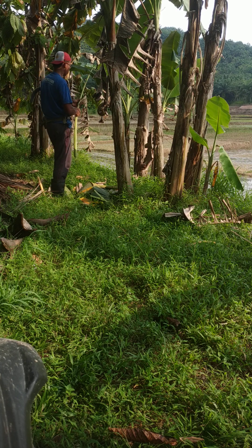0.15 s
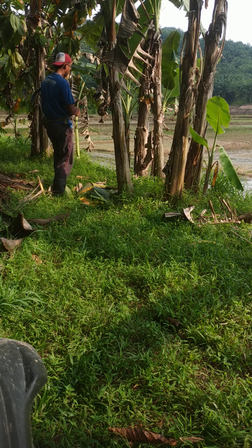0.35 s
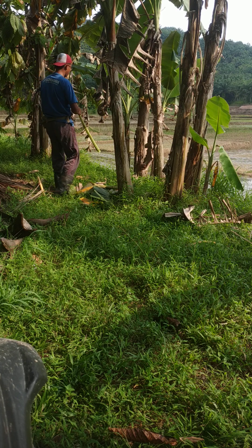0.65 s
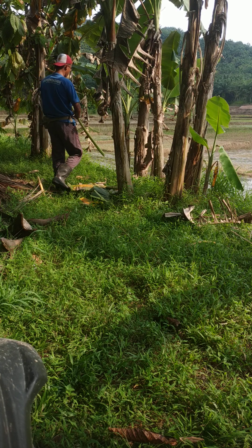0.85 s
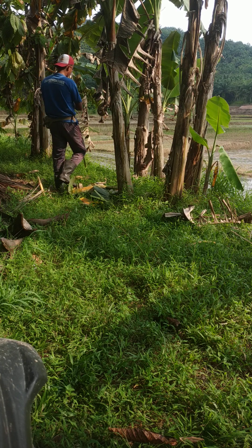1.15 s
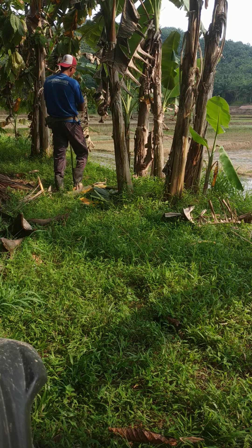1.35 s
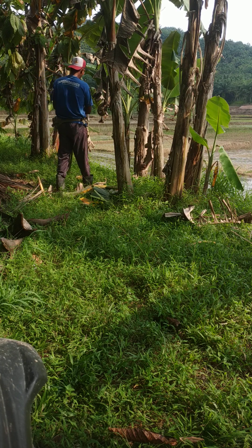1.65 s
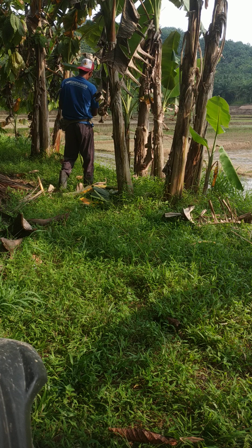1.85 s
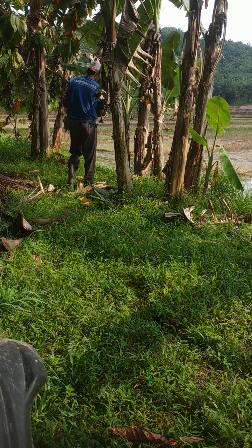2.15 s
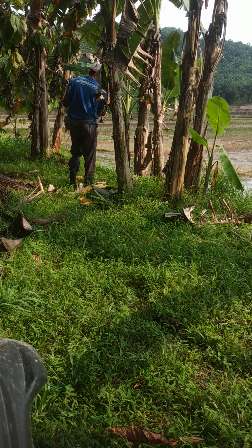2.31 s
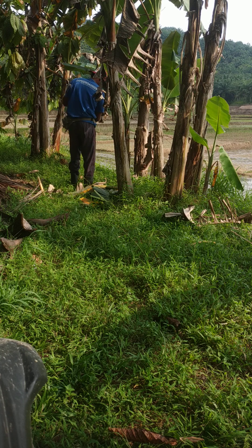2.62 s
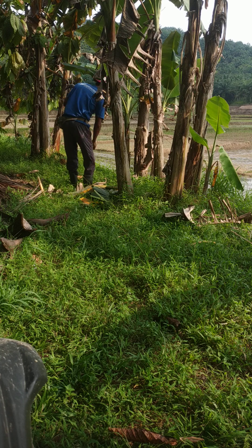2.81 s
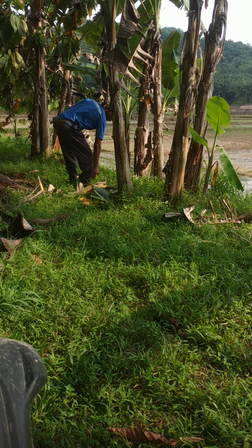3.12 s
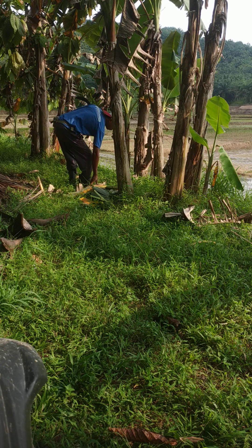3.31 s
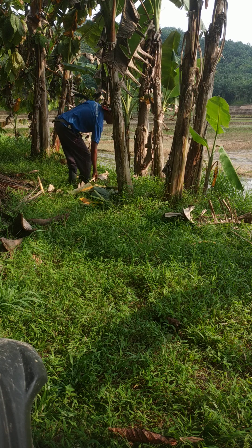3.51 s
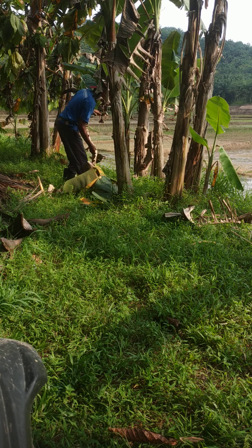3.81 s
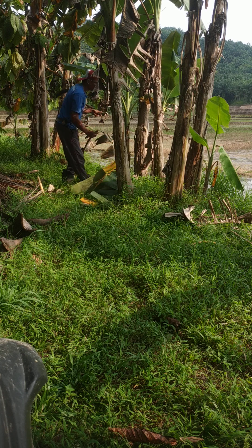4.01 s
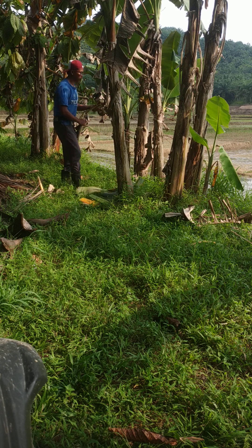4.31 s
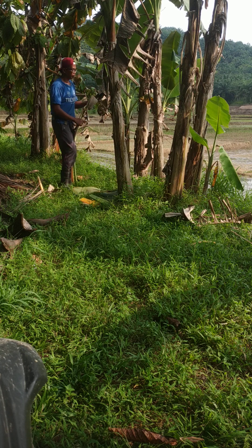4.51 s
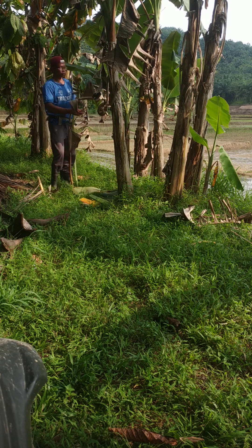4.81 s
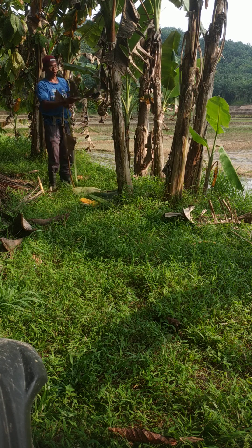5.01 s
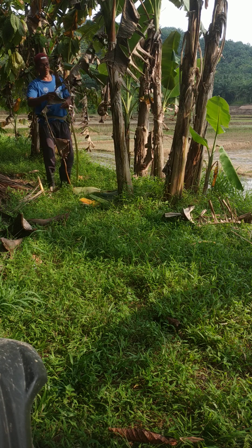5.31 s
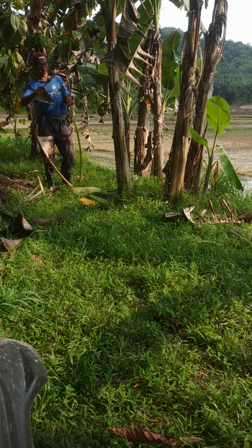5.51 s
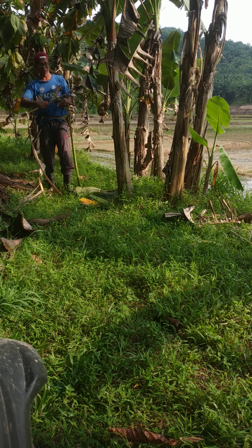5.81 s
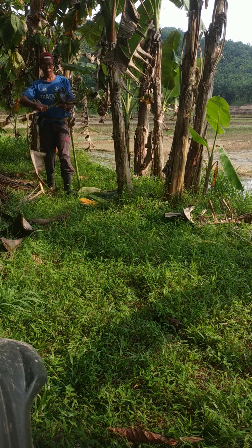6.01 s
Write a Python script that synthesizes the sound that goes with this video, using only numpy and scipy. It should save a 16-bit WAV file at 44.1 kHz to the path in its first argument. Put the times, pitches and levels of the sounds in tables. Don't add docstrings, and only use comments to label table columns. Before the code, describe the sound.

Brittle plant fibres snap and papery sheets rattle in uneven bursts, with small hollow stalk knocks, against quiet outdoor hiss and faint insects.

```python
import sys
import numpy as np
from scipy import signal
from scipy.fft import rfft, irfft, next_fast_len
from scipy.io import wavfile
from scipy.ndimage import uniform_filter1d, map_coordinates

SR = 44100
rng = np.random.default_rng(int(sys.argv[2]) if len(sys.argv) > 2 else 0)


def ratio_of_db(decibels):
    return 10 ** (np.asarray(decibels, float) / 20)


def wav_record(signal):
    frames = np.transpose(np.atleast_2d(signal))
    bounded = np.clip(frames, -1, 1)
    quanta = np.round(bounded * 32767).astype(np.int16)
    wavfile.write(sys.argv[1], SR, quanta)


N = 271215

# (frequency [Hz], level [dB per Hz])
FIBRE_COLOUR = [(3000, -31.5), (5500, -6.5), (6460, -5), (7730, 0.5), (10700, 0.5), (11800, -1.5),
                (14900, -2), (17000, -15.5)]
PING_COLOUR = [(3000, -31), (6500, -11.5), (8000, 0), (9500, 3), (11500, -4), (13500, -11), (16500, -15.5)]
RIB_COLOUR = [(1500, -38.5), (2800, -8), (3500, -1), (4800, 2.5), (6000, -5.5), (7500, -2), (12000, -64.5)]
SHEET_COLOUR = [(650, -37.5), (1100, -12.5), (1500, -7), (2400, -1.5), (2900, -6), (4000, -14.5),
                (8000, -86.5)]
STALK_COLOUR = [(71, -70), (120, -42), (185, -1), (249, -3), (317, -6.5), (527, 1), (1500, -4.5),
                (1950, -10.5), (3300, -120)]
EXHAUST_COLOUR = [(60, -34.5), (100, -24), (112, -16), (135, -5.5), (165, -7), (210, 3), (260, -5.5),
                  (400, -24), (800, -54)]
# (frequency [Hz], level [dB per Hz])
AIR_COLOUR = [(30, -37), (245, 0.5), (740, -5.5), (1300, -8), (2600, -8.5), (3100, -9), (3900, -9),
              (5000, -5.5), (6300, -9.5), (7500, -7), (8450, -13), (9000, -4.5), (10900, 0), (11400, -4),
              (12500, -1), (14500, -5.5), (15700, -4.5)]
# (frequency [Hz], likeness [0 to 1])
AIR_LIKENESS = [(60, 1), (180, 0.65), (550, 0.6), (1650, 0.16), (4970, 0.13), (15000, 0.15)]
# (frequency [Hz], left over right [dB])
AIR_LEAN = [(60, -1), (240, -2), (950, -1.5), (3770, 2.5), (15000, -6)]
# (frequency [Hz], rms level [dB], left over right [ratio])
WHINE_TONES = [(1055.8, -72, -.3), (1249.4, -70, -.1), (3362.5, -71, .7), (3556, -72, .35),
               (5669, -71, -.1), (5862, -71, -.1), (9227, -76, 0), (10282, -64, 0), (10475.5, -64, 0),
               (10760, -72, 0), (10862, -71, 0), (11143, -73, 0), (11337.5, -70, 0), (11531, -70, 0),
               (11725, -76, 0), (12010, -74, 0), (12204, -74, 0), (12588.5, -65, 0), (12782, -65, 0),
               (13451, -73, 0), (13644.5, -67, 0), (13838, -63, -.1), (14032, -71, 0), (14508, -77, 0),
               (14896, -76, 0), (15089, -73, 0)]
# (time [s], level [dB])
ENGINE_LEVEL = [
    (0.0, -61.5),
    (0.8, -66.5),
    (2.43, -59),
    (3.3, -62),
    (4.0, -59),
    (4.4, -64.5),
    (5.2, -65.5),
    (6.15, -66),
]
# (frequency [Hz], time to fade by 60 dB [s])
GROVE_FADE = [(200, 0.085), (2000, 0.072), (12000, 0.23)]
# (time [s], peak level [dB], pitch [Hz])
STALK_KNOCKS = [(1.444, -38.5, 887), (4.88, -38, 736), (4.92, -39, 697), (5.165, -41, 780),
                (1.428, -41.5, 2210), (1.492, -46, 970), (1.511, -36, 971), (1.659, -46.5, 1025),
                (2.437, -49, 804), (3.747, -38, 268), (3.835, -40, 1985), (3.9, -39, 2430),
                (3.958, -36, 301), (4.335, -39, 225), (5.036, -44, 556), (5.096, -38, 208),
                (5.28, -32.5, 1224), (5.35, -34, 417), (5.87, -46, 660), (4.023, -38, 346),
                (4.084, -33, 243), (4.316, -37.5, 226), (4.694, -37, 480), (4.757, -36, 500),
                (4.799, -40, 336), (4.869, -39, 1950), (5.091, -34, 780), (5.124, -35.5, 528),
                (5.151, -37.5, 670), (5.255, -34, 612), (5.277, -30, 943), (5.326, -30.5, 880),
                (5.379, -31, 984), (5.46, -36, 418), (5.604, -47, 667), (5.829, -39.5, 776),
                (6.036, -39, 645)]
# (time [s], peak level [dB], pitch [Hz])
FLAT_SLAPS = [(1.3475, -30, 2000), (1.3565, -32, 2050), (4.0805, -28, 260), (4.0815, -32.5, 570),
              (5.8255, -30, 738), (5.8285, -37, 1400), (5.607, -43.5, 676), (5.783, -42, 590),
              (5.712, -46.5, 509), (5.333, -27.5, 1750), (5.342, -32, 1100), (5.391, -31, 1300),
              (5.91, -41, 1200), (6.047, -39.5, 775), (6.134, -39.5, 880), (4.378, -43, 759),
              (3.842, -34, 2300), (3.91, -33, 2450), (2.2885, -34.5, 7750), (2.296, -33, 7800),
              (2.309, -33.5, 6000), (2.255, -42, 5400), (2.314, -41, 2000), (5.3, -37.5, 3800),
              (4.795, -37, 4300), (5.365, -33, 1500)]
# (time [s], peak level [dB], sheet part
# over peak [dB], left over right [dB])
RIPS_RUNNING = [(1.3469, -23.5, -22, 3), (1.859, -49.5, -3, 6), (2.2464, -38.5, -21, 7),
                (2.266, -39, -37, 10), (2.287, -36, -25, 4), (2.309, -31, -21, 6), (3.503, -26, -22, 3),
                (4.316, -25, -27, -1), (4.3244, -25.5, -35, 9), (4.5766, -36.5, -13, 1),
                (4.839, -23, -20, 8.5), (4.87, -25, -26.5, 3), (4.9611, -26.5, -15.5, 3),
                (5.0946, -28.5, -21, 7), (5.149, -30.5, -14, 4), (5.1874, -29, -13.5, 8),
                (5.2024, -29, -20.5, -8.5), (5.2527, -28, -17.5, 6.5), (5.2781, -26, -17.5, 11),
                (5.3482, -27.5, -12.5, 10), (5.854, -30.5, -17.5, 7), (6.038, -33, -16, 4),
                (6.048, -29, -19.5, 2)]
TICKS_ALONE = [(1.3477, -21, -24, -2), (1.354, -25, -18, -4.5), (1.6207, -37.5, -5.5, 4),
               (2.3112, -25, -35, 8), (2.315, -31, -30, 2), (2.3205, -30, -28, 3), (2.3222, -22, -25, -4),
               (2.439, -41.5, -8.5, 0), (2.896, -29, -15.5, 6), (2.898, -38, -19, 1), (3.6183, -29, -15, 1),
               (3.748, -30, -15, -6), (3.834, -26, -20, 5), (3.8445, -26, -18, 4), (3.861, -26, -21, 2),
               (4.422, -22, -18.5, 1), (4.7557, -16.5, -24.5, 4), (5.0956, -24, -23, 1),
               (5.1005, -25, -20, 3), (5.1502, -20.5, -22, 0), (5.1506, -22, -24, 0), (5.2278, -23, -29, 4),
               (5.2285, -20.5, -25, 5), (5.257, -17.5, -23, 1), (5.299, -26, -28, 4),
               (5.343, -17, -23, 1.5), (5.4094, -26, -19, 7), (5.4227, -19.5, -33.5, -4),
               (5.557, -22, -21, 6), (5.5578, -23.5, -16.5, 2), (5.575, -32, -39.5, 12),
               (5.6055, -33, -7, 3), (5.6705, -24, -44, 8), (5.8252, -37, 5.5, -0.5),
               (5.9091, -23.5, -22, 3.5), (5.9382, -17, -29, 6), (5.9524, -26, -37, -3),
               (6.0516, -27.5, -17, 1.5), (6.0948, -15.5, -32, 6.5), (6.1023, -23, -19, 4),
               (6.1422, -21, -16, -2)]
MORE_TICKS_ALONE = [(0.4678, -32, -30, -2), (3.4865, -29, -22, 1), (3.7256, -30, -25, 4),
                    (4.6878, -24.5, -26, 0), (4.743, -28.5, -13, 2), (4.776, -26.5, -10, 2),
                    (4.849, -24, -12, 2), (4.971, -26, -12, 3), (4.329, -19, -30, 3), (5.5356, -33, -28, 2),
                    (5.8383, -29, -22, 1), (5.8459, -26.5, -22, 3), (5.972, -32, -29, 2),
                    (6.085, -30, -28, 2), (6.1342, -23.5, -13.5, 4), (2.2547, -36, -7, 10),
                    (4.0433, -29, -1, 3.5), (5.4945, -38, 0, 2), (2.289, -29, -29, 5), (2.295, -37, -30, 4),
                    (2.302, -33, -30, 4), (5.2795, -18, -25, 4), (5.345, -17.5, -16, 7),
                    (5.349, -20, -20.5, -2)]
# (peak time [s], level [dB], rise [s per 20 dB], fall [s per 20 dB])
HAND_TUGS = [(0.466, -53, 2.1, 0.26), (0.8, -53.5, 0.5, 0.9), (1.348, -36.5, 0, 0.07), (1.4, -45.5, 0.2, 0),
             (1.5, -42, 0.31, 0.22), (1.7, -52.5, .5, 1), (2.068, -42.5, 0.16, 0.14),
             (2.25, -39, -0.03, 0.31), (2.288, -36, -0.01, .2), (2.305, -34.5, 0.07, 0.01),
             (2.897, -48, -0.23, -0.05), (3.035, -46.5, 0.37, 0.08), (3.328, -44, 0.12, 0.1),
             (3.51, -38, 0.13, .1), (3.6, -43.5, 0.25, 1), (3.72, -42, 0.2, 0.4), (3.845, -35, 0.34, 0.2),
             (3.97, -36.5, 0.19, 0.16), (4.07, -33.5, 0.4, 0.22), (4.32, -30.5, -0.02, 0.1),
             (4.42, -36, 0.25, 0.08), (4.5, -45.5, 0.3, 1), (4.6, -39, 0.24, 0.3),
             (4.775, -32.5, 0.32, 0.17), (4.842, -28.5, 0, 0.13), (4.97, -36.5, 0.36, 0.37),
             (5.06, -37.5, 0.2, 0.14), (5.2, -38, 0.5, 0.02), (5.305, -29.5, 0.17, 0.25),
             (5.56, -42, -0.06, 0.4), (5.856, -38, 0.12, 0.3), (5.935, -37, 0.3, .25),
             (6.1, -36.5, 0.48, 3)]
# (peak time [s], sheet rattle [dB], rise [s per 20 dB], fall [s per 20 dB],
# stalk scrape over rattle [dB])
SHEATH_SHAKES = [(0.402, -69, 1.5, -0.5, -14), (0.8, -61.5, 0.1, 0.7, -5), (1.349, -45.5, 0.04, 0.19, -15),
                 (1.48, -52.5, 0.27, 0.25, -5), (2.055, -60, 0.2, 0.04, -6), (2.249, -57, -0.13, 0.2, -21),
                 (3.0, -57, -0.05, 0, 4), (3.33, -60.5, -0.06, 7, -5), (3.509, -50.5, 0.05, 0.1, -8.5),
                 (3.75, -49, 0.14, 0.34, 0.5), (3.83, -41, 0.2, 0.23, -8), (3.91, -41, 0.21, 0.2, -13.5),
                 (4.07, -47, 0.3, 0.2, -0.5), (4.321, -47.5, 0, 0.2, -2), (4.58, -55.5, 0.5, 0.5, 0.5),
                 (4.77, -45.5, 0.25, 0.1, -1.5), (4.843, -42, 0.07, 0.2, -2.5), (4.971, -44, 0, -0.12, -3),
                 (5.03, -51, 0.37, 0.3, 0.5), (5.1, -47.5, 0.18, 0.16, 1), (5.16, -51.5, 0.2, 0.26, 3),
                 (5.28, -46, 0.13, 0.06, 0.5), (5.345, -42.5, 0.16, 0.22, 0.5), (5.5, -59.5, 1, 0.5, -3),
                 (5.825, -43.5, 0, 0.06, 0), (5.86, -50.5, .1, 0.07, -0.5), (5.916, -49.5, 0, 0.04, -2.5),
                 (6.053, -51.5, 0.3, 0, -2.5), (6.148, -47.5, 0.14, .1, -5)]
# (frequency [Hz], level [dB])
ROUNDING_STEP = [(1500, -12), (2300, -3), (3000, 6.5), (4500, 6.5), (6400, 8.5), (8500, 7.5), (9800, 3),
                 (13500, 4), (15500, 6.5)]

LEFT_LAG = 4
FIRINGS_PER_S = 22.15
TUG_RIBS_DB, TUG_SHEET_DB, SHAKE_RIBS_DB = -11, -26, -3
RIP_AFTER_DB, RIP_T60_S, TICK_AFTER_DB, TICK_T60_S = -4.5, 0.064, -22, 0.047
RIP_RISE_S, RIP_CLICK_DB, TICK_FRAY_DB = 0.0012, -4, 0
KNOCK_T60_S, KNOCK_RISE_S, SLAP_T60_S, SLAP_RISE_S = 0.05, 0.0027, 0.025, 0.00078
BODY_WET_DB, SNAP_WET_DB = -6.5, -7.5
TOP_HZ = 15760


def unit(x):
    return x / np.sqrt(np.mean(x ** 2) + 1e-20)


def along(points, hz):
    f, v = np.transpose(points)
    return np.interp(np.log(hz + 1), np.log(f + 1), v)


def wobble(rate):
    knots = rng.standard_normal(int(N * rate / SR) + 4)
    return map_coordinates(knots, [np.arange(N) * rate / SR])


def filtered(x, response):
    m = next_fast_len(N + 8192)
    return irfft(rfft(x, m) * response(np.fft.rfftfreq(m, 1 / SR)), m)[..., :N]


def struck(x, colour):
    level = np.maximum(along(colour, np.fft.rfftfreq(2048, 1 / SR)), -70)
    cepstrum = irfft(np.log(ratio_of_db(level)))
    cepstrum[1:1024] *= 2
    cepstrum[1025:] = 0
    ring = irfft(np.exp(rfft(cepstrum)))
    return signal.fftconvolve(x, ring[None] / np.linalg.norm(ring), axes=1)[:, :N]


def patchy(x, depth_db, wide, long):
    z = signal.stft(x, nperseg=256)[2]
    field = uniform_filter1d(rng.standard_normal(z.shape[1:]), size=wide, axis=0)
    field = uniform_filter1d(field, size=long, axis=1)
    return signal.istft(z * ratio_of_db(depth_db * unit(field)), nperseg=256)[1][:, :N]


def rush(colour, patchy_db):
    pair = patchy(rng.standard_normal((2, N)), patchy_db, wide=3, long=28)

    def mid_side(hz):
        angle = np.arccos(np.clip(along(AIR_LIKENESS, hz), -1, 1)) / 2
        return ratio_of_db(along(colour, hz)) * [np.cos(angle), np.sin(angle)]

    def lean(hz):
        return ratio_of_db(along(AIR_LEAN, hz) / 2 * np.array([[1], [-1]]))

    mid, side = filtered(pair, mid_side)
    return unit(filtered(np.array([mid + side, mid - side]), lean))


def air():
    insect_colour = [(3900, -120), (4120, -5.5), (4260, 2), (4420, -10.0), (4600, -17.5), (4900, -120)]
    insects = ratio_of_db(-62.5 + 1.1 * wobble(7.2)) * rush(insect_colour, patchy_db=0.5)
    hiss = ratio_of_db(-49.0 + 0.087 * wobble(5.0)) * rush(AIR_COLOUR, patchy_db=1.54)
    return hiss + insects


def engine():
    s, db = np.transpose(ENGINE_LEVEL)
    speed = FIRINGS_PER_S + .25 * wobble(1.5) + .2 * wobble(12)
    fired = np.diff(np.floor(np.cumsum(speed) / SR), prepend=0)
    puffs = unit(struck((fired * ratio_of_db(1.0 * wobble(20)))[None], EXHAUST_COLOUR))
    level = ratio_of_db(np.interp(np.arange(N) / SR, s, db) - 4)
    return level * (puffs * ratio_of_db([[-.6], [.6]]) + 0.79 * rush(EXHAUST_COLOUR, patchy_db=2.0))


def whine():
    t = np.cumsum(1 + .00012 * wobble(1.5)) / SR
    out = np.zeros((2, N))
    for hz, db, left in WHINE_TONES:
        tone = np.sin(2 * np.pi * (hz * t + rng.random()))
        out += ratio_of_db(db + 9) / (1 + left) * tone * np.array([[left], [1]])
    return out


def grove(x):
    hz, t, z = signal.stft(rng.standard_normal((2, SR // 3)), SR, nperseg=256)
    apart = np.clip(hz / 1500, 0, 1)[:, None]
    z = np.array([z[0] + apart * z[1], z[0] - apart * z[1]]) / np.sqrt(1 + apart ** 2)
    fade = ratio_of_db(-60 * t / along(GROVE_FADE, hz)[:, None])
    tail = signal.istft(z * fade, SR, nperseg=256)[1]
    late = np.pad(x, ((0, 0), (200, 0)))
    return signal.fftconvolve(late, tail / np.linalg.norm(tail[0]), axes=1)[:, :N]


def knocks():
    out, t = np.zeros(N + SR), np.arange(SR // 8) / SR
    ratio = np.array([[1], [1.13], [1.7], [.72]])
    hits = [(*row, KNOCK_T60_S, KNOCK_RISE_S) for row in STALK_KNOCKS]
    hits += [(*row, SLAP_T60_S, SLAP_RISE_S) for row in FLAT_SLAPS]
    for s, db, hz, t60, rise in hits:
        phase = 0.16 * rng.standard_normal((4, 1))
        modes = ratio_of_db([[0], [-6], [-9], [-14]]) * np.sin(2 * np.pi * (hz * ratio * t + phase))
        shape = ratio_of_db(db - 60 * t / t60) * (1 - np.exp(-t / rise))
        out[round(s * SR):][:len(t)] += shape * modes.sum(0)
    return np.array([out[:N], out[:N]])


def snaps():
    rips, sheet, ticks = np.zeros((3, 2, N + SR))
    t = np.arange(SR // 8) / SR
    gathers = 1 - np.exp(-t / RIP_RISE_S)
    breaks = [(*row, RIP_T60_S, RIP_AFTER_DB, False) for row in RIPS_RUNNING]
    breaks += [(*row, TICK_T60_S, TICK_AFTER_DB, True) for row in TICKS_ALONE + MORE_TICKS_ALONE]
    for s, db, sheet_db, pan_db, t60, after_db, alone in breaks:
        z = rng.standard_normal((4, len(t)))
        fray = z[0] * ratio_of_db(-60 * t / .0035)
        fray = fray / np.linalg.norm(fray)
        click = (t == 0) + ratio_of_db(TICK_FRAY_DB) * fray if alone else ratio_of_db(RIP_CLICK_DB) * fray
        click = 1.6 * np.array([np.roll(click, LEFT_LAG), click])
        after = gathers * (z[1:3] + 0.98 * z[0]) * ratio_of_db(after_db - 60 * t / t60 + 0.77 * z[3])
        hit = (click + after) * ratio_of_db(db + 0.5 + pan_db / 2 * np.array([[1], [-1]]))
        place = slice(round(s * SR), round(s * SR) + len(t))
        (ticks if alone else rips)[:, place] += hit
        sheet[:, place] += ratio_of_db(sheet_db + 4.5) * (hit + 0.21 * hit[::-1])
    fibres = struck(rips[:, :N], FIBRE_COLOUR) + struck(ticks[:, :N], PING_COLOUR)
    return fibres + struck(sheet[:, :N], SHEET_COLOUR) + ratio_of_db(-1.5) * struck(sheet[:, :N], RIB_COLOUR)


def swells(rows):
    t = np.arange(0, N + 64, 32) / SR
    power = np.zeros(len(t))
    for s, db, rise, fall in rows:
        away = np.maximum((s - t) / max(rise, .001), (t - s) / max(fall, .001))
        power += ratio_of_db(2 * (db - 20 * away))
    return np.interp(np.arange(N) / SR, t, np.sqrt(power))


def cracks(count, scatter_db, clump_db):
    u, g = rng.random((count, 2)), rng.standard_normal((count, 3))
    at = u[:, 0] * (N - 200) + 100
    size = np.sign(g[:, 0]) * ratio_of_db(-scatter_db * np.log(u[:, 1] + .002))
    spread_s = .00008
    lag = np.clip(LEFT_LAG + g[:, 1] * abs(g[:, 1]) * spread_s * SR, -80, 80) / 2
    lean = ratio_of_db(1.2 * g[:, 2])
    left = np.bincount(np.round(at + lag).astype(int), size * lean, N)
    right = np.bincount(np.round(at - lag).astype(int), size / lean, N)
    return np.array([left, right]) * ratio_of_db(clump_db * wobble(45))


def rustle():
    tug, shake = swells(HAND_TUGS), swells([row[:4] for row in SHEATH_SHAKES])
    scrape = swells([(s, db + stalk_db, rise, fall) for s, db, rise, fall, stalk_db in SHEATH_SHAKES])
    jerks = 1.6 * wobble(40)
    fizz = unit(struck(cracks(count=70000, scatter_db=2.0, clump_db=0.5), FIBRE_COLOUR))
    ribs = unit(struck(cracks(count=20000, scatter_db=2.0, clump_db=2.5), RIB_COLOUR))
    sheet = unit(struck(cracks(count=20000, scatter_db=2.0, clump_db=0.0), SHEET_COLOUR))
    stalk = unit(struck(cracks(count=8000, scatter_db=1.0, clump_db=2.0), STALK_COLOUR))
    parts = tug * fizz + scrape * stalk
    parts += np.hypot(ratio_of_db(TUG_RIBS_DB) * tug, ratio_of_db(SHAKE_RIBS_DB) * shake) * ribs
    parts += np.hypot(ratio_of_db(TUG_SHEET_DB) * tug, shake) * sheet
    effort = tug + shake + 1e-9
    even = patchy(parts / effort, depth_db=2.0, wide=4, long=10)
    return ratio_of_db(jerks + [[.8], [-.8]]) * effort * even


def scene():
    def bass_cut(hz):
        return 1 / (1 + (150 / (hz + 1)) ** 4)

    body = filtered(rustle() + knocks(), bass_cut)
    sharp = filtered(snaps(), bass_cut)
    scatter = grove(ratio_of_db(BODY_WET_DB) * body + ratio_of_db(SNAP_WET_DB) * sharp)
    return air() + engine() + whine() + scatter + body + sharp


def masked(x):
    hop = 1024
    n, k = np.arange(2 * hop)[:, None] + .5, np.arange(hop) + .5
    hz = k * SR / (2 * hop)
    basis = np.sin(np.pi * n / (2 * hop)) * np.cos(np.pi / hop * (n + hop / 2) * k) * np.sqrt(2 / hop)
    ms = np.pad([x[0] + x[1], x[0] - x[1]], ((0, 0), (hop, 2 * hop - N % hop))).reshape(2, -1, hop) / 2
    frames = np.concatenate([ms[:, :-1], ms[:, 1:]], axis=2)
    lines = frames @ basis
    nearby = np.sqrt(abs(uniform_filter1d(lines ** 2, size=64, axis=2)))
    step = nearby * ratio_of_db(along(ROUNDING_STEP, hz)) + 1e-9
    scatter = rng.standard_normal((len(step[0]), hop // 16))
    step = step * ratio_of_db(1.6 * np.repeat(scatter, 16, axis=1))
    blocks = (frames[0] ** 2).reshape(-1, 8, hop // 4).mean(2) + 1e-12
    rise = blocks[:, 2:] / np.maximum(blocks[:, 1:-1], blocks[:, :-2])
    sudden = (rise.max(1) > ratio_of_db(2 * 8))[:, None]
    peaky = (abs(frames[0]).max(1) > ratio_of_db(15) * frames[0].std(1))[:, None]
    rounded = np.sign(lines) * np.floor(abs(lines) / step + .4) * step
    lines = np.where(peaky & (hz > 7200) | sudden, lines, rounded)
    back = lines @ basis.T
    mid, side = (back[:, 1:, :hop] + back[:, :-1, hop:]).reshape(2, -1)[:, :N]
    return np.array([mid + side, mid - side])


def low_pass(x):
    return signal.sosfilt(signal.butter(12, 16050, fs=SR, output="sos"), x)


def record(dry):
    kept = filtered(masked(dry), lambda hz: hz < TOP_HZ)
    return low_pass(kept)


dry = scene()
out = record(dry)
wav_record(out)
```